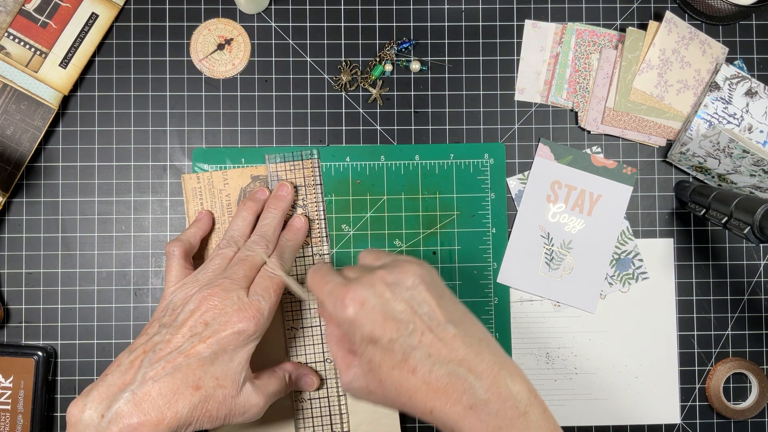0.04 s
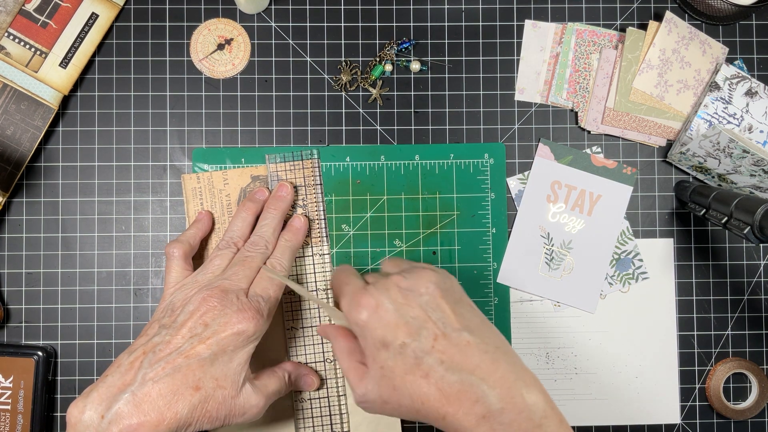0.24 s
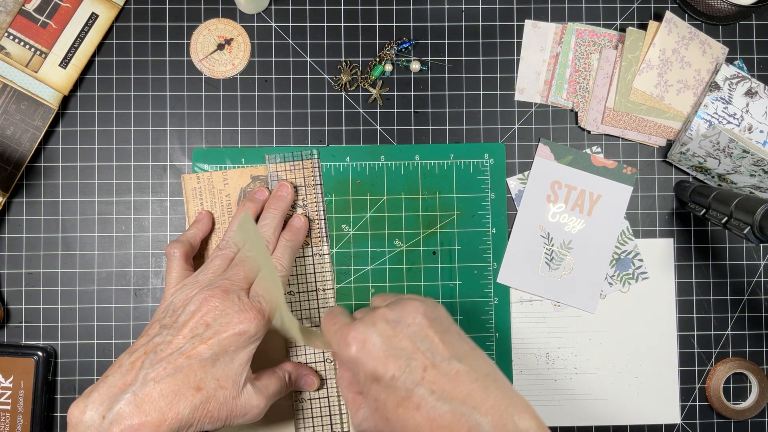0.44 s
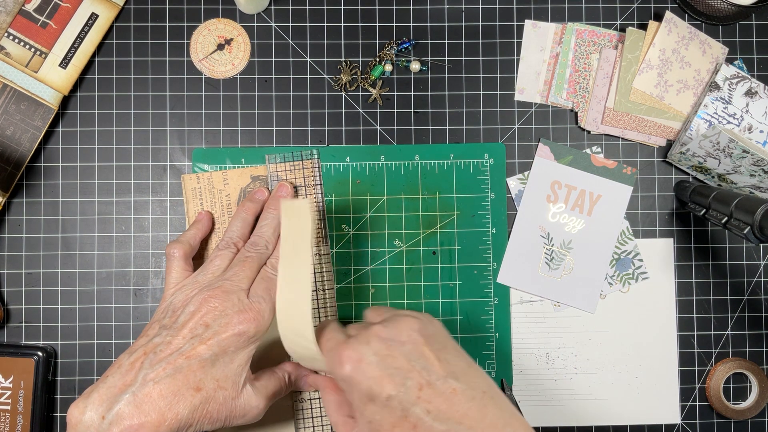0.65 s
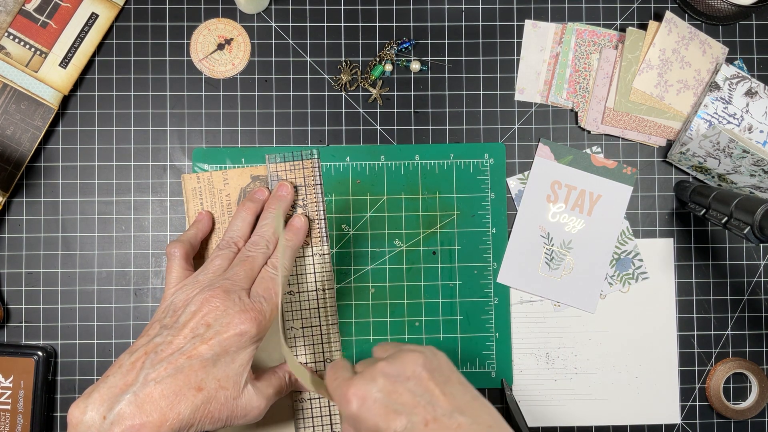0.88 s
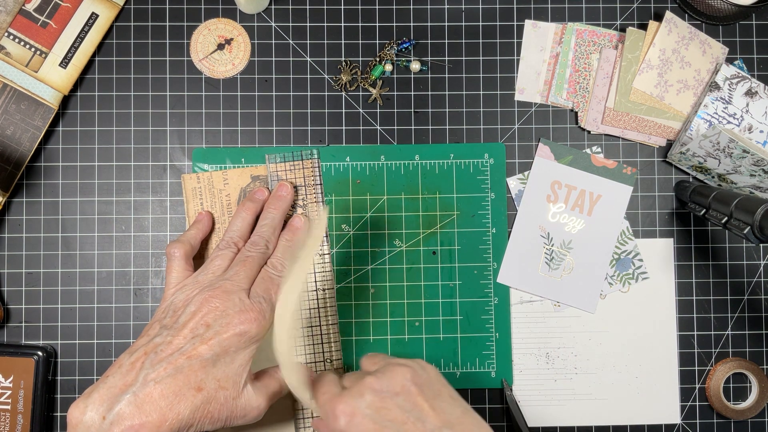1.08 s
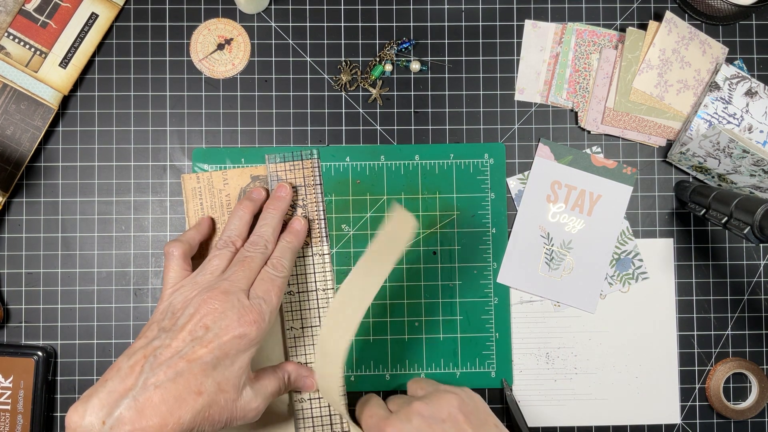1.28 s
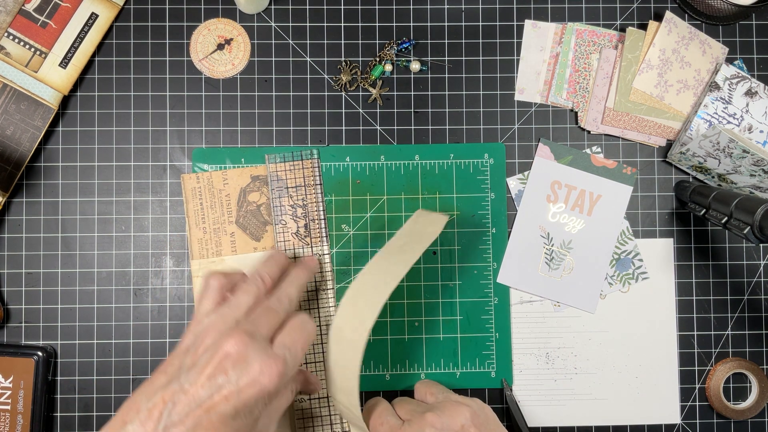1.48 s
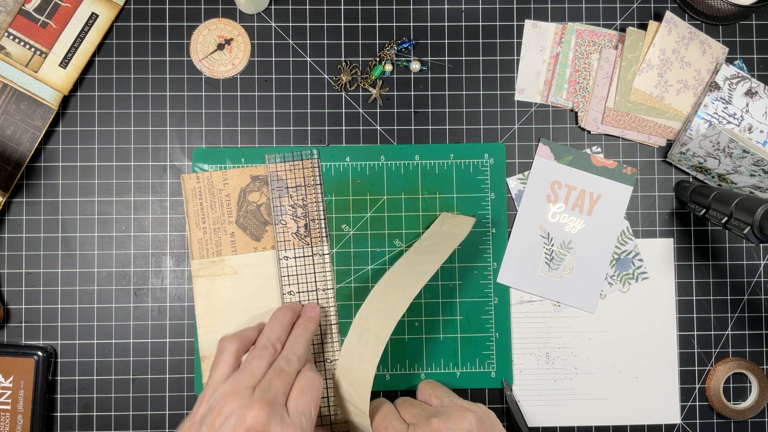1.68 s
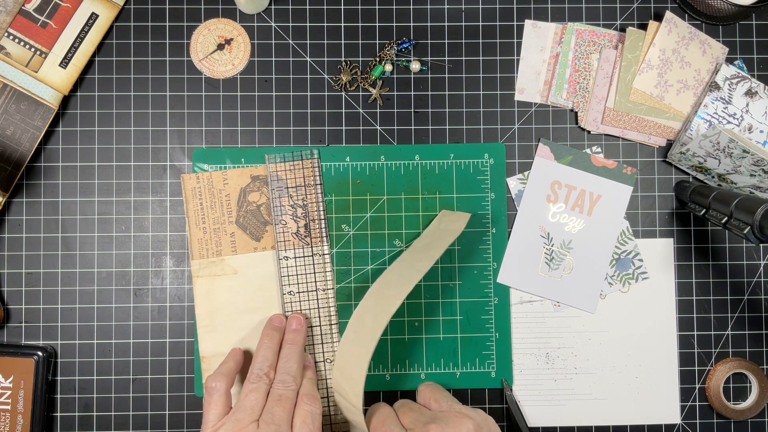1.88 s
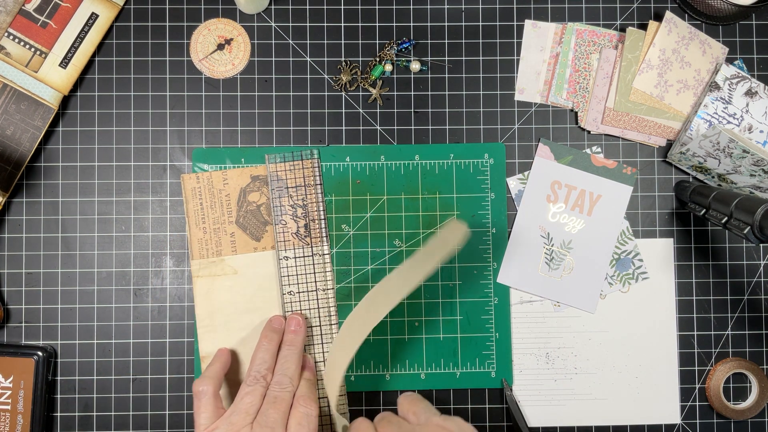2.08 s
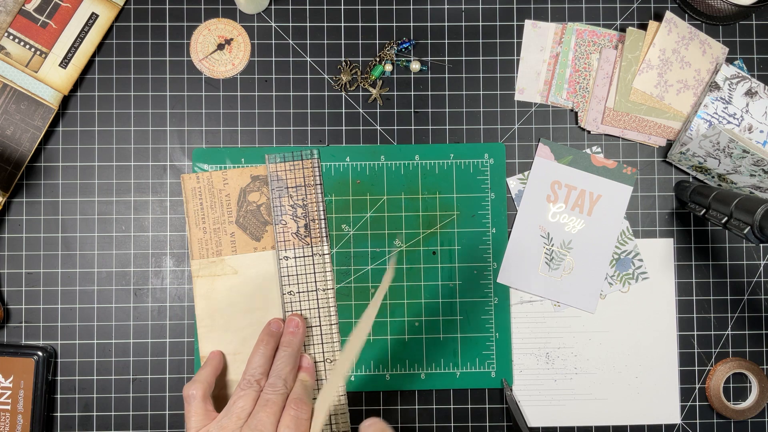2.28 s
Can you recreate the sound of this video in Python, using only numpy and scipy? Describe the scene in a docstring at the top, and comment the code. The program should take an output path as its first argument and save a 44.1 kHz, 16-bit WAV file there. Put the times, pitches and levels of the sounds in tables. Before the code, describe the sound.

Close up in a small, fairly dry room, paper rips sharply three times in the first second, fibres snapping; soft hand brushing and a tiny ruler knock follow, then a brief snapping tug over low steady hum.

```python
"""A strip of paper is torn off against a ruler on a cutting mat, in a small room with a low steady hum. The
paper strip slides over the mat from the start, as random grains of coloured noise that swell between the rips.
Three quick rips follow, dense runs of breaking fibres coloured by strip resonances, with larger snaps. Between
rips come light taps as resonant bursts, a brushing hiss and one ruler knock of decaying modes. In a last tug
the mat and table hum as narrow-band noise; close reflections and a tail follow the sounds."""
import sys
import numpy as np
from scipy import signal
from scipy.fft import rfft, irfft
from scipy.io import wavfile
from scipy.ndimage import uniform_filter1d

SR = 44100
rng = np.random.default_rng(int(sys.argv[2]) if len(sys.argv) > 2 else 0)


def file_out(sig):
    """Save sig as 16-bit WAV at sys.argv[1]."""
    # one column per channel
    cols = np.atleast_2d(sig).T
    # limit, then scale
    lim = np.clip(cols, -1, 1)
    pcm = np.round(lim * 32767).astype(np.int16)
    wavfile.write(sys.argv[1], SR, pcm)


N = 102929
TIME = np.arange(N) / SR
CUTOFF_HZ = 16000


def from_db(db):
    """Amplitude ratio: 20 dB is a factor of ten."""
    return 10 ** (np.asarray(db) / 20)


def rms_one(x):
    """Normalisation of the effective value (rms) to 1."""
    return x / np.sqrt(np.mean(x ** 2) + 1e-20)


def colour(x, points):
    """Spectral shaping: each frequency is weighted, in dB over log frequency, then the rms is set to 1."""
    hz, db = np.transpose(points)
    f = np.maximum(np.arange(len(x) // 2 + 1) * SR / len(x), 1)
    weight = from_db(np.interp(np.log(f), np.log(hz), db))
    return rms_one(irfft(rfft(x) * weight, len(x)))


def resonate(x, hz, width_hz):
    """Resonance by heterodyning: shift the centre, which may move, to 0 Hz, smooth and shift back."""
    r = np.exp(-np.pi * width_hz / SR)
    turn = np.exp(2j * np.pi * np.cumsum(hz * np.ones(N)) / SR)
    ringing = turn * signal.lfilter([1 - r], [1, -r], x / turn + 1e-18)
    return 2 * ringing.real - (1 - r) * x  # gain 1 on top


def butterworth(x, hz, kind):
    """Maximally flat filtering by a fourth-order design."""
    return signal.sosfilt(signal.butter(4, hz, kind, fs=SR, output="sos"), x)


def grains(per_s, spread_db):
    """Shot noise: clicks of random time, sign and size."""
    sizes = from_db(spread_db * np.minimum(rng.exponential(1, N), 4))
    return sizes * rng.choice([-1, 1], N) * (rng.random(N) < per_s / SR)


def bundles():
    """Clustered excitation: uneven surges, each sudden and exponentially spent, with rms 1."""
    surges_per_s, power_decay_s = 220, 0.0034
    power_spread_db = 7.5  # strong and weak surges; the square root below halves it
    at = (np.cumsum(rng.gamma(2, .5, size=2000)) / surges_per_s * SR).astype(int)
    sizes = from_db(power_spread_db * rng.uniform(-1.8, 1, len(at)))
    starts = np.zeros(N)
    starts[at[at < N]] = sizes[at < N]
    power = signal.lfilter([1], [1, -np.exp(-1 / (power_decay_s * SR))], starts + 1e-12)
    return rms_one(np.sqrt(power))


def wander(x, depth_db, per_s, count=40):
    """Time-varying spectrum: narrow bands swell and fade on their own as the paper bends."""
    f = np.arange(N // 2 + 1) * SR / N
    place = np.sqrt(np.minimum(f / CUTOFF_HZ, 1)) * (count - 1)
    spectrum = rfft(x)
    swings = rng.standard_normal((count, 600))
    gains = from_db(depth_db * np.clip(swings, -2, 2))
    gains = gains / np.sqrt(np.mean(gains ** 2, axis=0))
    out = np.zeros(N)
    for k, gain in enumerate(gains):
        band = irfft(spectrum * np.maximum(1 - abs(place - k), 0), N)
        # the bands change at staggered times
        out += band * np.interp(TIME * per_s + k / count, np.arange(len(gain)), gain)
    return out


def hum():
    """Superposition of steady low ventilation rumble, as shaped noise, and one weak pure tone."""
    # Rumble spectrum. Each row: frequency in Hz, relative spectral level in dB.
    rumble_colour = [(28, -68), (40, -37.5), (55, -10), (115, -5.5), (146, -0.5), (200, -5), (260, -19),
                     (340, -23), (600, -32.5), (1500, -42), (15800, -59.5)]
    rumble_db, tone_hz, tone_db = -55, 145.3, -63
    tone = np.sqrt(2) * np.sin(2 * np.pi * (tone_hz * TIME + rng.random()))
    rumble = colour(rng.standard_normal(N), rumble_colour)
    return from_db(rumble_db) * rumble + from_db(tone_db) * tone


def slide():
    """Friction noise: paper and skin rub in fine grains and small catches, with wandering colour."""
    # The strip sliding on the mat, later the hand sliding. Each row: time in seconds, level in dB.
    rub_levels = [(0, -50.5), (.16, -53), (.27, -54), (.385, -49), (.405, -68), (.45, -64), (.59, -54),
                  (.835, -51.5), (.86, -66.5), (1.03, -54), (1.27, -53.5), (1.44, -66.5), (1.575, -73.5),
                  (1.61, -79), (1.84, -78.5), (1.875, -61), (1.915, -55), (1.95, -60), (2.015, -53),
                  (2.06, -73.5), (2.15, -66), (2.27, -50.5), (2.33, -64.5)]
    # Rubbing spectrum. Each row: frequency in Hz, relative spectral level in dB.
    rub_colour = [(300, -12), (700, -17), (1000, -7.5), (1400, -4.5), (1800, -9), (2700, -4.5), (4200, 2.5),
                  (5500, 0.5), (9000, -3), (15800, -8.5)]
    # The hand brushing over the ruler. Each row: centre in seconds, half length (to 1/e) in seconds,
    # level in dB of the rubbing before its low part is removed.
    brushes = [(1.537, 0.064, -60.5), (1.676, 0.018, -57)]
    catch_share = .45  # share of the rubbing that comes in small catches
    catches = rms_one(1 - catch_share + catch_share * bundles())
    friction = colour(grains(per_s=8300, spread_db=3.0), rub_colour)
    rub = catches * wander(friction, depth_db=2.0, per_s=18)
    thin = butterworth(rub, 3260, "high")
    brushing = sum(from_db(db) * np.exp(-((TIME - s) / half_s) ** 2) for s, half_s, db in brushes)
    return rub * from_db(np.interp(TIME, *np.transpose(rub_levels))) + thin * brushing


def crackling(together, hz, kind):
    """Fracture noise: one register of breaking fibres, its surges partly its own, evened over 500 samples."""
    # Fibre spectrum. Each row: frequency in Hz, relative spectral level in dB.
    fibre_colour = [(180, -33), (380, -18), (750, -17), (1300, -8.5), (1700, -11), (2700, -5), (4500, 0.5),
                    (6800, -4.5), (8300, 2), (13500, -4), (15800, -7)]
    share = 0.72  # share of the surges common to all registers
    surges = share * together + (1 - share) * bundles()
    breaks = grains(per_s=11000, spread_db=2.5) * surges
    band = butterworth(colour(breaks, fibre_colour), hz, kind)
    return band / np.sqrt(uniform_filter1d(band ** 2, size=500) + 1e-9)


def rips():
    """Amplitude modulation: the pull sets the level of body, crackle and treble through four tears."""
    # Three rips and the last tug. Each row: time in seconds, level of the pull in dB,
    # treble re the pull in dB, body re the pull in dB; the register trims below come on top.
    first_rip = [(0.021, -51, -3.5, -14), (0.032, -51, 0, -13), (0.035, -36.5, 3.5, -13),
                 (0.062, -30.5, -5, -11), (0.098, -28, -3.5, -11), (0.114, -26.5, -7.5, -9.5),
                 (0.132, -33.5, -8, -18), (0.155, -47.5, -5, -1.5)]
    second_rip = [(0.445, -58, -4, -12.5), (0.464, -51.5, -3.5, -14.5), (0.48, -36.5, 0.5, -12),
                  (0.486, -31, -4.5, -5), (0.497, -39.5, 0.5, -9.5), (0.52, -23.5, -8.5, -14.5),
                  (0.54, -26.5, -5.5, -7.5), (0.568, -27.5, -9.5, -7.5), (0.576, -46, -1.5, -5.5),
                  (0.601, -56, -1.5, 6)]
    third_rip = [(0.882, -60, 6, -20.5), (0.892, -50.5, 1, -28), (0.909, -47.5, -1, -11),
                 (0.924, -48, -8, -3), (0.929, -35.5, -4, -10.5), (0.972, -28.5, -7, -8),
                 (0.992, -34.5, -1, -1.5), (1.004, -44.5, 0, -5.5), (1.032, -54.5, 4, -1),
                 (1.045, -66, -12, -1)]
    last_tug = [(2.158, -66, -5, -8.5), (2.163, -41.5, 6, -7), (2.18, -37, 1, -6.5), (2.197, -33, 1, -6.5),
                (2.226, -35, -3, -5), (2.25, -32.5, -3.5, -6.5), (2.263, -36, -5, -5),
                (2.27, -50.5, -10, -33), (2.29, -52, -13, -13)]
    body_hz, treble_hz = 2240, 7110  # body below, treble above
    body_trim_db, crackle_trim_db, treble_trim_db = -2.5, -2, 1.5
    together = bundles()
    body = from_db(body_trim_db) * crackling(together, body_hz, "low")
    crackle = from_db(crackle_trim_db) * crackling(together, [body_hz, treble_hz], "band")
    treble = from_db(treble_trim_db) * crackling(together, treble_hz, "high")
    out = np.zeros(N)
    for rip in (first_rip, second_rip, third_rip, last_tug):
        s, *columns = np.transpose(rip)
        level_db, treble_db, body_db = [np.interp(TIME, s, c) for c in columns]
        pull = from_db(level_db) * (TIME >= s[0]) * (TIME <= s[-1])
        out += pull * (crackle + from_db(treble_db) * treble + from_db(body_db) * body)
    return out


def strip(tearing):
    """Forced resonance: tearing excites short-lived rings that sink as the freed strip grows longer."""
    # Rings as free length and bend change. Each row: centre in seconds, half length (to 1/e) in seconds,
    # frequency at the centre in Hz, width in Hz, gain as a factor.
    strip_rings = [(0.047, 0.033, 4430, 270, 2.4), (0.1136, 0.02, 2840, 600, 3.8),
                   (0.088, 0.012, 1600, 140, 2.3), (0.095, 0.061, 727, 90, 3.2),
                   (0.9, 0.043, 2200, 94, 2.1), (0.49, 0.055, 2900, 1300, 1.3),
                   (.545, 0.039, 5350, 620, 0.44), (0.902, 0.074, 5900, 1800, 1.4),
                   (2.17, 0.017, 2330, 210, 2.9), (2.175, 0.022, 8200, 510, 1.1),
                   (2.23, 0.014, 1940, 130, 2.4), (2.215, 0.03, 1260, 90, 1.6)]
    sag_oct_per_s = 0.31
    out = tearing.copy()
    for s, half_s, hz, width_hz, gain in strip_rings:
        excitation = tearing * np.exp(-((TIME - s) / half_s) ** 2)
        sinking_hz = hz * 2 ** (sag_oct_per_s * (s - TIME))
        out += gain * resonate(excitation, sinking_hz, width_hz)
    return out


def burst(s, decay_s):
    """Impulsive excitation: a sudden cluster of tiny clicks that decays exponentially."""
    age = TIME - s
    return rng.choice([-1, 1], N) * (age >= 0) * np.exp(-np.maximum(age, 0) / decay_s)


def clicks(rows, width):
    """Damped resonance: each short burst excites one broad peak; width is relative to the centre."""
    out = np.zeros(N)
    for s, db, hz, decay_s in rows:
        b, a = signal.iirpeak(hz, 1 / width, fs=SR)
        ringing = signal.lfilter(b, a, burst(s, decay_s) + 1e-18)
        bandwidth_makeup = np.sqrt(SR / (np.pi * width * hz))
        out += from_db(db) * bandwidth_makeup * ringing
    return out


def snaps():
    """Sudden fracture: larger snaps of the paper are bursts through a broad resonance."""
    # Each row: start in seconds, level in dB, centre in Hz, decay of the burst in seconds.
    paper_snaps = [(.0340, -26, 5940, 0.0031), (.0393, -25.5, 4870, .002), (.0515, -24, 4770, 0.0033),
                   (.0755, -26, 4160, 0.0061), (.0965, -25, 4800, 0.002), (.4490, -38.5, 6960, 0.002),
                   (.4620, -31.5, 6000, 0.0018), (.4703, -24, 4370, 0.0024), (.5005, -17, 4360, 0.0043),
                   (.5085, -10.5, 3300, 0.0019), (.5098, -16.5, 4500, 0.0015), (.9122, -27, 5760, 0.0046),
                   (.9248, -23, 5860, 0.005), (1.0122, -29.5, 4950, 0.0016), (1.1032, -33.5, 4100, 0.0023),
                   (1.902, -37, 4500, .0014), (2.1130, -48, 6500, 0.0013), (2.1494, -38, 4700, .002),
                   (2.1762, -26, 8100, 0.00096), (2.2222, -21, 5740, 0.0022), (2.2335, -17.5, 5160, .0014),
                   (2.2438, -22, 5500, .002)]
    return clicks(paper_snaps, width=0.5)


def taps():
    """Damped resonance: light taps, and the low body of some snaps, are bursts through a broader peak."""
    # Each row: start in seconds, level in dB, centre in Hz, decay of the burst in seconds.
    taps_and_bodies = [(.373, -44, 2000, 0.007), (.4215, -51.5, 1400, 0.0046), (.6463, -43.5, 2080, 0.0034),
                       (.6587, -35.5, 1730, 0.0041), (.673, -45, 1580, 0.0042), (.682, -40.5, 3630, 0.0067),
                       (1.1032, -39, 1800, 0.0027), (1.662, -59, 1200, .005), (1.902, -44, 1110, 0.002),
                       (2.1494, -46, 1210, .0025)]
    return clicks(taps_and_bodies, width=0.63)


def ruler():
    """Modal ringing: the plastic ruler, settling as the hand lifts, sounds as decaying sines."""
    # Each row: frequency in Hz, decay in seconds, level re the knock in dB.
    ruler_modes = [(4150, .004, 0), (5750, .0025, -6), (7450, .002, -5)]
    knock_s, knock_db = 1.6625, -39
    age = np.maximum(TIME - knock_s, 0)
    out = np.zeros(N)
    for hz, decay_s, mode_db in ruler_modes:
        out += from_db(knock_db + mode_db) * np.sin(2 * np.pi * hz * age) * np.exp(-age / decay_s)
    return out


def mat_and_table():
    """Narrow-band noise: cutting mat and table hum during the last tug, even in level, unsteady in pitch."""
    centre_s, half_s, level_db = 2.222, .05, -53
    hz, width_hz = 336, 25  # width of each of the two resonances in series
    once = resonate(rng.standard_normal(N), hz, width_hz)
    ringing = resonate(once, hz, width_hz)
    held = np.exp(-((TIME - centre_s) / half_s) ** 4)
    # keeping only the phase makes the level even
    even = rms_one(np.cos(np.angle(signal.hilbert(ringing))))
    return from_db(level_db) * held * even


def room(x):
    """Convolution with an impulse response: direct sound, close reflections and a short, duller tail."""
    # Table top and nearby things. Each row: delay in seconds, gain as a factor.
    reflections = [(.0014, 0.07), (.0037, 0.19)]
    # Tail spectrum. Each row: frequency in Hz, relative spectral level in dB.
    tail_colour = [(1500, 4), (16000, -14)]
    t60_s, tail_db = .24, -16.5  # tail energy re the direct sound
    age = TIME[:SR // 2]
    tail = colour(rng.standard_normal(len(age)), tail_colour)
    tail = tail * from_db(-60 * age / t60_s) * np.minimum(age / 0.0032, 1)
    response = from_db(tail_db) * tail / np.sqrt(np.sum(tail ** 2))
    response[0] += 1
    for delay_s, gain in reflections:
        response[int(delay_s * SR)] += gain
    return signal.fftconvolve(x, response)[:N]


def scene():
    """Superposition: paper, hands, mat and table pass through the room; the hum is added directly."""
    paper = strip(wander(rips(), depth_db=3.2, per_s=45)) + snaps()
    rubs_and_taps = slide() + taps() + ruler()
    return (room(paper + rubs_and_taps + mat_and_table()) + hum())[None]


def record(dry):
    """Band limiting: a steep elliptic low-pass cuts the top."""
    return signal.sosfilt(signal.ellip(12, .1, 80, CUTOFF_HZ, fs=SR, output="sos"), dry)


dry = scene()
out = record(dry)
file_out(out)
```